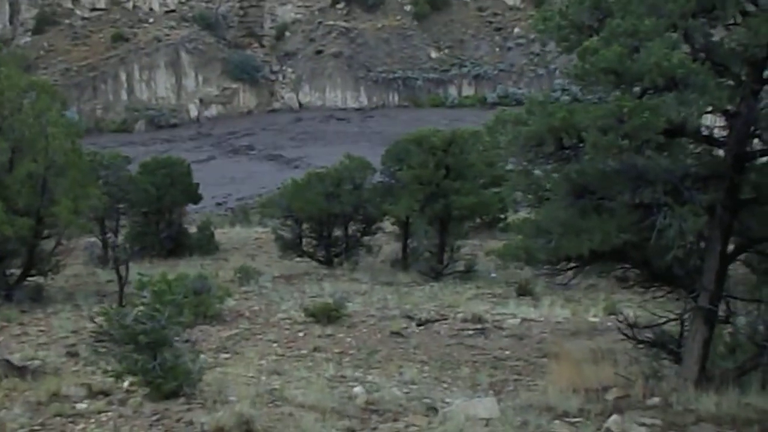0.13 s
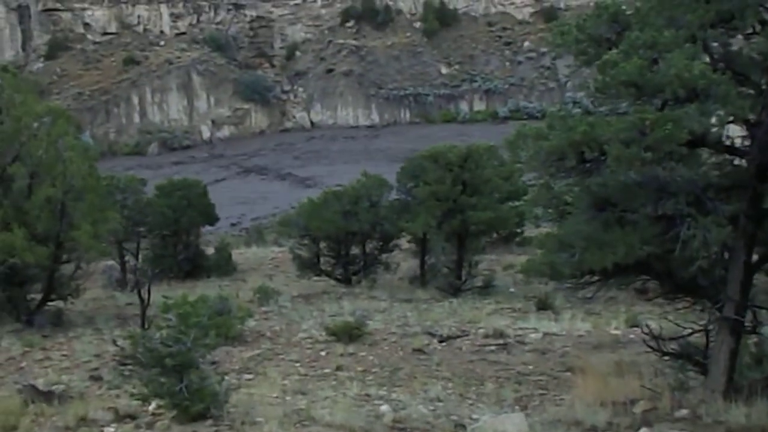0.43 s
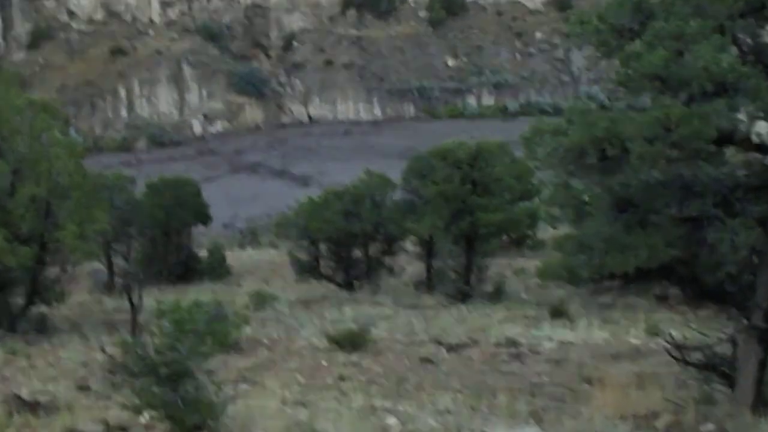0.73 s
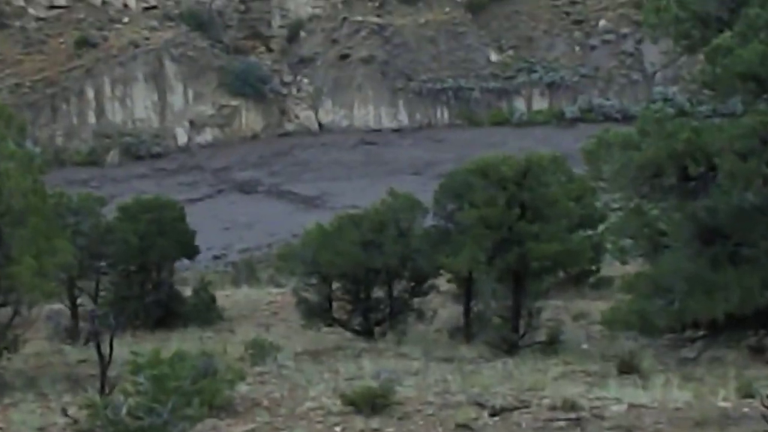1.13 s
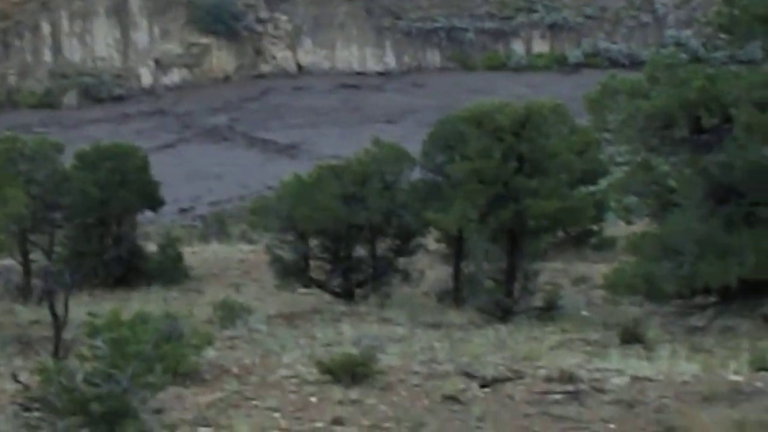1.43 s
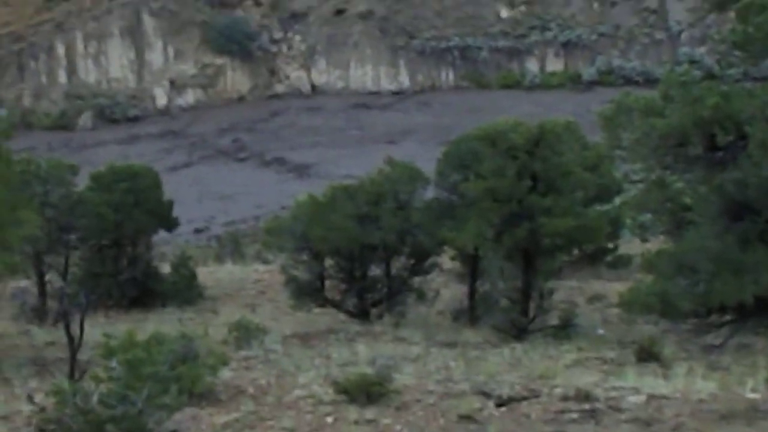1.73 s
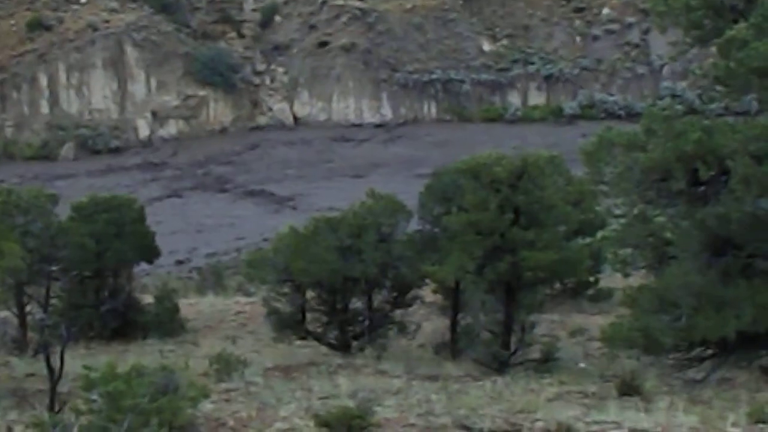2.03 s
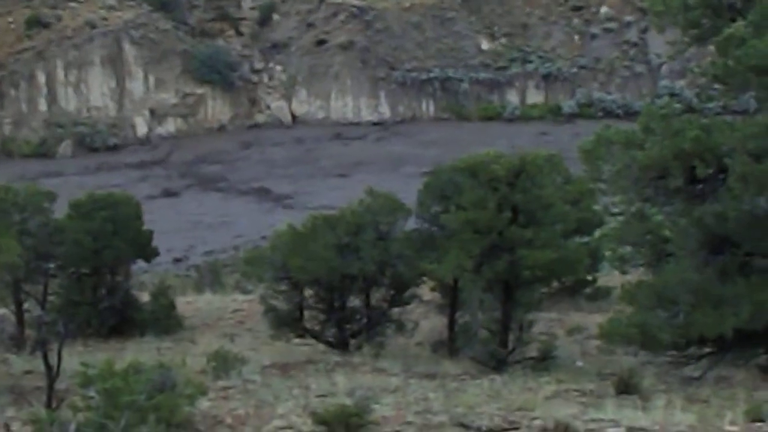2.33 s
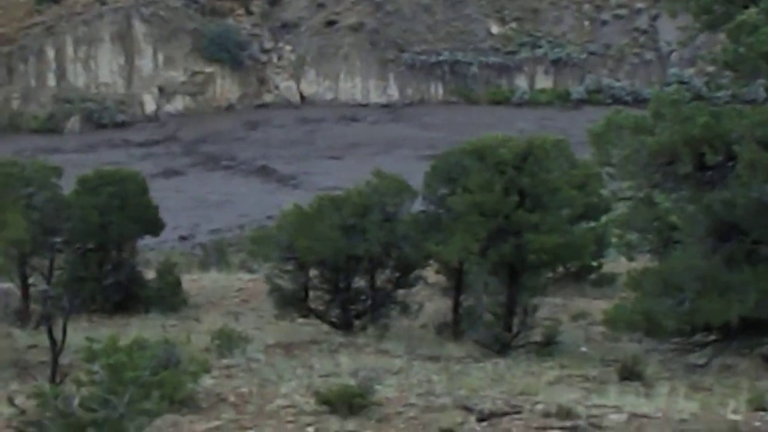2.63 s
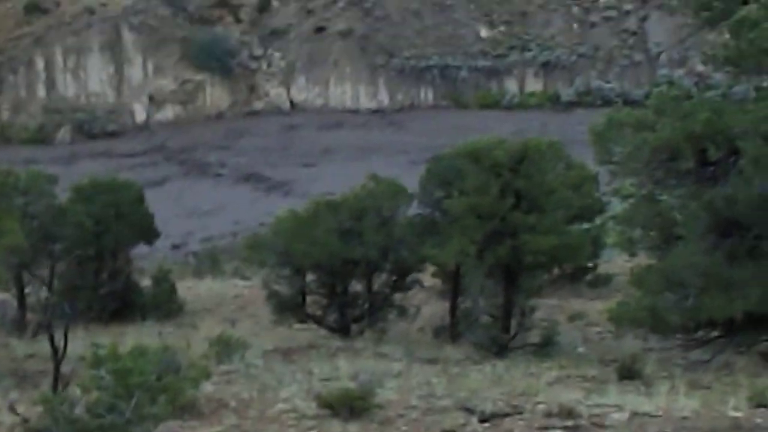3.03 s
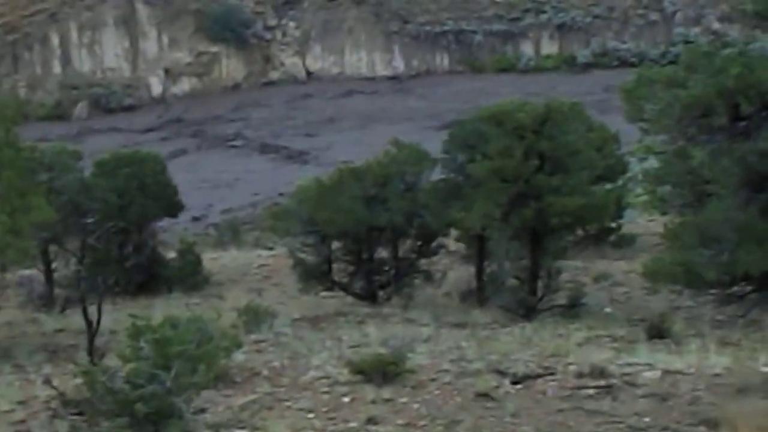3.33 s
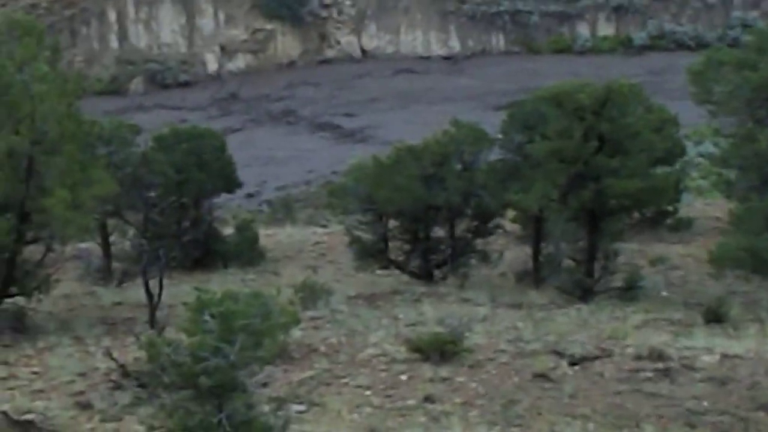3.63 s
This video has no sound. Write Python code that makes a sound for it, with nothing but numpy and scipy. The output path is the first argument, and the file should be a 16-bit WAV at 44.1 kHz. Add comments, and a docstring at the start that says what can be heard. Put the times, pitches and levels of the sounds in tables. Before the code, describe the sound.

A debris flow roars steadily down a canyon, with a couple of close handling clicks.

```python
"""A debris flow running down a canyon channel, heard from some way off on a hand-held camera's microphone.
Churning mud and stones make a steady roar, full of small slaps and knocks, under a thin wash of spray.
Right at the microphone, fingers click on the camera's plastic body, which rings and rattles;
the hardest click overloads the camera, and its limiter briefly ducks the roar."""
import sys
import numpy as np
from scipy import signal
from scipy.fft import rfft, irfft, next_fast_len
from scipy.io import wavfile
from scipy.ndimage import uniform_filter1d, minimum_filter1d, map_coordinates

SR = 44100
rng = np.random.default_rng(int(sys.argv[2]) if len(sys.argv) > 2 else 0)


def waveform_to_disk(signal):
    """Save audio, clipped to [-1, 1], as 16-bit WAV at the path in sys.argv[1]."""
    frames = np.transpose(np.atleast_2d(signal))
    scaled = np.clip(frames, -1, 1) * 32767
    samples = np.round(scaled).astype(np.int16)
    wavfile.write(sys.argv[1], SR, samples)


N = 166257

# Strength of the flow, heard from across the canyon: time_s, level_db
FLOW_STRENGTH = [(0, -33.5), (0.381, -33.5), (.58, -32), (1.25, -32), (1.7, -33), (2.0, -32), (2.4, -33.2),
                 (2.6, -32), (3.22, -32), (3.45, -33.5), (3.77, -33)]

def debris_flow(surge_db=.08, churn_db=.42, slops_db=-11, spray_db=-10, spray_follows=.7):
    """Down in the channel, one flow strength drives the roar, the slops within it and the spray above."""
    level_db = np.interp(np.arange(N) / SR, *np.transpose(FLOW_STRENGTH))
    swing_db = level_db - level_db.mean() + surge_db * wobble(5.3)
    roar = mud_roar()
    spray = amp(spray_db + spray_follows * swing_db) * spray_wash()
    churn = amp(swing_db + churn_db * wobble(18))
    return amp(level_db.mean()) * (churn * (roar + amp(slops_db) * slops()) + spray)


# Spectrum of the mud and stones, some way off: frequency_hz, relative_level_db
ROAR_SPECTRUM = [(20, -41.5), (60, -38), (100, -29.5), (160, -20), (230, -14), (310, -12.5), (410, -11.5),
                 (500, -6), (600, -1), (850, 1), (1000, 0), (1200, -4.5), (1600, -10), (1850, -19),
                 (2400, -29), (6000, -60.5)]

def mud_roar():
    """Mud and stones churn together into one broad noise."""
    return rush(ROAR_SPECTRUM, patchy_db=.52)


def slops(per_s=160, centre_hz=790, log_spread=.24, decay_cycles=14):
    """Short, soft slaps of mud and knocks of stones, blurred by distance."""
    count = int(per_s * N / SR)
    start = rng.integers(0, N, count)
    pitch, size = rng.standard_normal((count, 2)).T
    samples = np.arange(SR // 20)
    cycles = centre_hz * np.exp(log_spread * pitch)[:, None] * samples / SR
    age = cycles / decay_cycles
    envelope = amp(2 * size)[:, None] * age * amp(-60 * age)
    knocks = envelope * np.sin(2 * np.pi * cycles)
    return unit(np.bincount((start[:, None] + samples).ravel(), knocks.ravel(), N)[:N])


# Spectrum of the spray, at the same distance: frequency_hz, relative_level_db
SPRAY_SPECTRUM = [(1000, -30.5), (1850, -7), (2220, 0), (2850, -4.5), (3120, -10.5), (3360, -13),
                  (3650, -7), (4200, -8), (5100, -12.5), (5500, -22.5), (5900, -27), (6300, -38.5)]

def spray_wash():
    """Spray and splashing at the flow's surface make a thin hiss."""
    return rush(SPRAY_SPECTRUM, patchy_db=.5)


# Fingers on the camera, right at the microphone:
# start_s, level_db, pitch_ratio, ring_length_ratio, brightness_db_per_octave, rattle_db
FINGER_CONTACTS = [(1.4384, -4.5, 0.92, .55, -3, -22), (1.4395, -5, 1.03, 0.73, -6, -27),
                   (1.452, -16.5, 0.62, 2, 0, -8.5), (1.4572, 3.5, 1, .75, 4, -19.5),
                   (1.4594, 1, 0.993, 0.79, 2, -13.5), (1.467, -16.5, 1.105, .6, 3, -7.5),
                   (2.1126, -1, 0.975, 0.51, -3.5, -29)]

def handling_clicks(attack_s=.00044, rattle_t60_s=.032, low_cut_hz=900):
    """Each contact rings the camera's plastic body for a few milliseconds and shakes its loose parts."""
    t = np.arange(SR // 20) / SR
    rings, rattle_power = np.zeros((2, N + SR))
    for start_s, level_db, pitch, length, brightness, rattle_db in FINGER_CONTACTS:
        start = round(start_s * SR)
        rise = amp(level_db) * (1 - np.exp(-t / attack_s))
        rings[start:][:len(t)] += rise * body_ring(t, pitch, length, brightness)
        rattle_power[start:][:len(t)] += (rise * amp(rattle_db - 60 * t / rattle_t60_s)) ** 2
    low_cut = signal.butter(2, low_cut_hz, "high", fs=SR, output="sos")  # a small body radiates no bass
    return signal.sosfilt(low_cut, rings[:N] + rattle(rattle_power[:N]))


# Modes of the plastic body around the microphone: pitch_hz, level_db, t60_s
BODY_MODES = [(1570, -14.5, 0.0077), (1846, -0.5, 0.015), (2157, -7.5, 0.011), (2717, -11.5, 0.014),
              (3220, -18.5, 0.014), (4023, -17.5, .013), (5020, -23, 0.014)]

def body_ring(t, pitch, length, brightness):
    """The struck body rings in decaying modes; brightness tilts them about the strongest."""
    ring, strongest_hz = 0, BODY_MODES[1][0]
    for hz, level_db, t60_s in BODY_MODES:
        envelope_db = level_db + brightness * np.log2(hz / strongest_hz) - 60 * t / (t60_s * length)
        ring += amp(envelope_db) * np.sin(2 * np.pi * hz * pitch * t)
    return ring


# Spectrum of the camera's loose parts, close up: frequency_hz, relative_level_db
RATTLE_SPECTRUM = [(800, -21), (1500, -0.5), (2200, 7), (2800, -1.5), (3400, -7), (4200, -5.5), (5200, -17),
                   (6200, -25.5)]

def rattle(power):
    """Loose parts buzz after a contact."""
    return np.sqrt(power) * rush(RATTLE_SPECTRUM, patchy_db=1.5)


def limiter(x, threshold_db=-6.5, attack_s=.011, hold_s=.026, release_db_per_s=236):
    """Peaks pull the camera's gain down; it holds, then recovers at a steady rate."""
    hold, attack = int(hold_s * SR), int(attack_s * SR)
    needed_db = np.minimum(threshold_db - 20 * np.log10(np.abs(x) + 1e-9), 0)
    held_db = minimum_filter1d(needed_db, hold, origin=(hold - 1) // 2)
    recovery_db = release_db_per_s * np.arange(N) / SR
    gain_db = np.minimum.accumulate(held_db - recovery_db) + recovery_db
    return x * amp(signal.lfilter(np.ones(attack) / attack, 1, gain_db))


def rush(spectrum, patchy_db):
    """Coloured noise of rms 1, its gain varying in random patches of time and frequency."""
    bins = signal.stft(rng.standard_normal(N), nperseg=512)[2]
    patches = uniform_filter1d(rng.standard_normal(bins.shape), size=5, axis=0)
    patches = uniform_filter1d(patches, size=12, axis=1)
    noise = signal.istft(bins * amp(patchy_db * unit(patches)), nperseg=512)[1][:N]
    knot_hz, knot_db = np.transpose(spectrum)
    return unit(filtered(noise, lambda hz: amp(np.interp(np.log(hz + 1), np.log(knot_hz + 1), knot_db))))


def wobble(knots_per_s):
    """A smooth random curve."""
    knots = rng.standard_normal(int(N * knots_per_s / SR) + 4)
    return map_coordinates(knots, [np.arange(N) * knots_per_s / SR])


def filtered(x, response):
    """Filter x by a gain given as a function of frequency."""
    size = next_fast_len(N + SR // 2)
    return irfft(rfft(x, size) * response(np.fft.rfftfreq(size, 1 / SR)), size)[:N]


def amp(db):
    """Decibels to gain."""
    return 10 ** (np.asarray(db) / 20)


def unit(x):
    """Scale to rms 1."""
    return x / np.sqrt(np.mean(x ** 2) + 1e-20)


def scene():
    """The distant flow and the close clicks, in mono at the microphone."""
    return (debris_flow() + handling_clicks())[None]


def record(dry, mic_top_hz=6300, ceiling=.72, bias=.02, top_hz=16200):
    """The camera's narrow-band microphone, its limiter, a slightly lopsided overload and a band limit."""
    mic = filtered(dry[0], lambda hz: np.clip((mic_top_hz - hz) / 700, 0, 1))
    overloaded = np.clip(limiter(mic), bias - ceiling, bias + ceiling)
    return filtered(overloaded, lambda hz: np.clip((top_hz - hz) / 700, 0, 1))[None]


dry = scene()
out = record(dry)
waveform_to_disk(out)
```